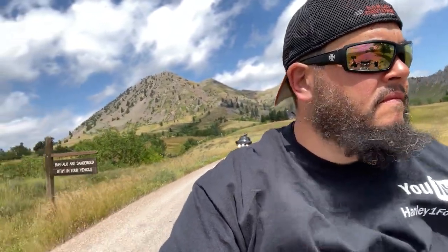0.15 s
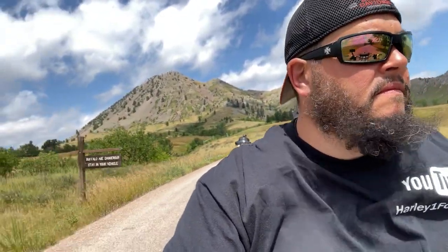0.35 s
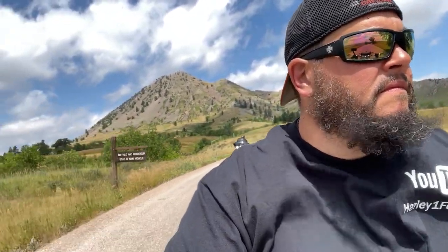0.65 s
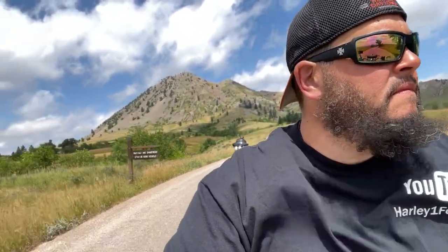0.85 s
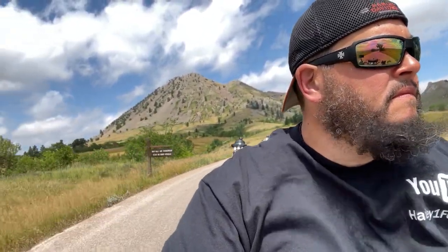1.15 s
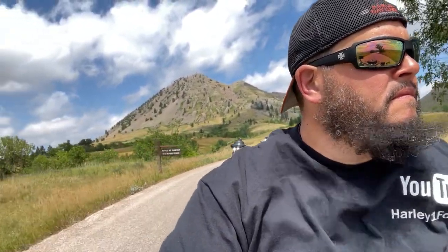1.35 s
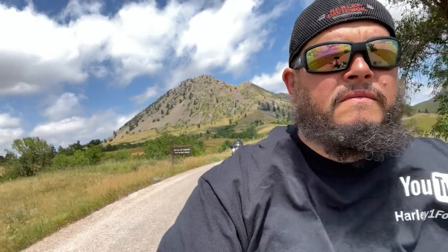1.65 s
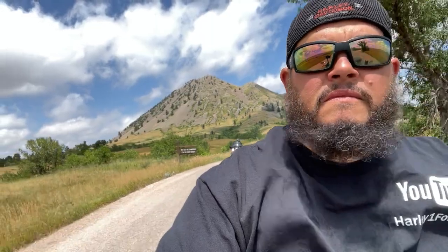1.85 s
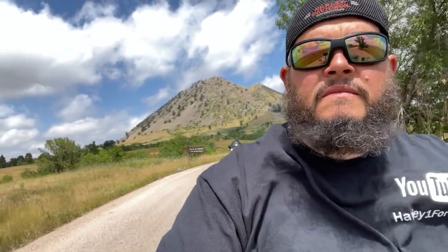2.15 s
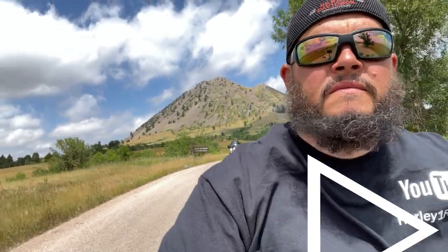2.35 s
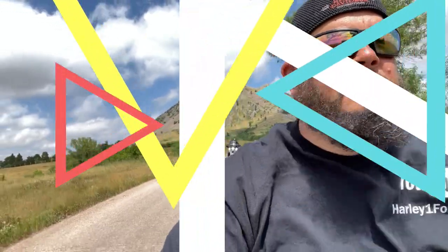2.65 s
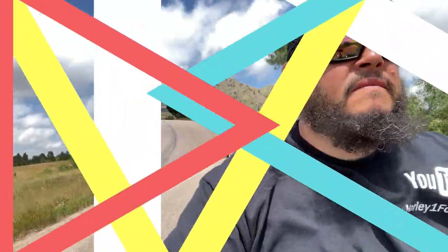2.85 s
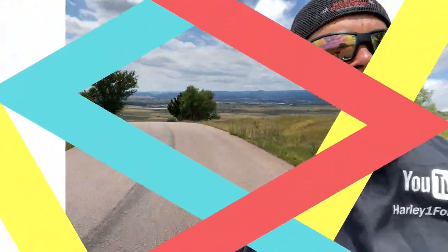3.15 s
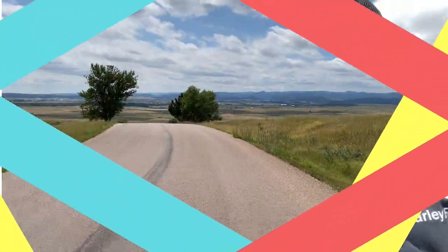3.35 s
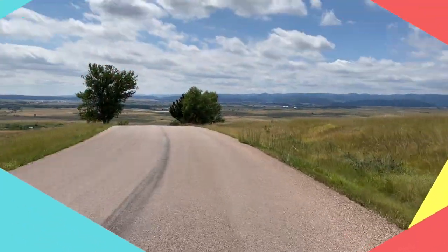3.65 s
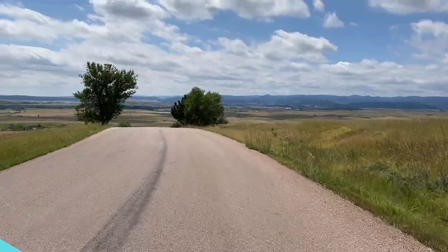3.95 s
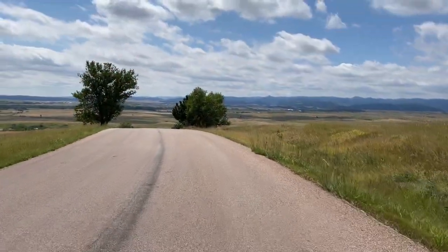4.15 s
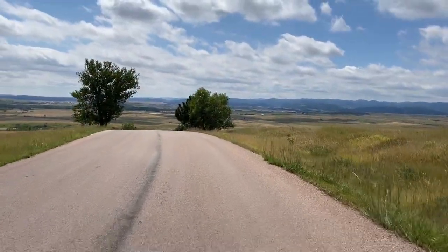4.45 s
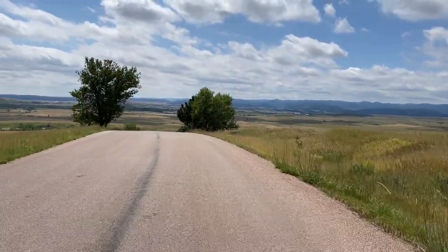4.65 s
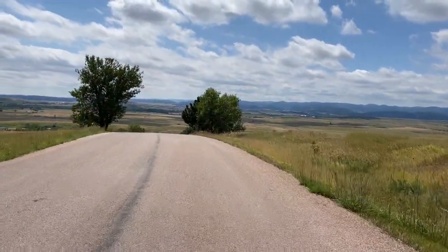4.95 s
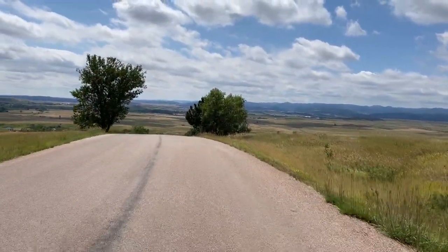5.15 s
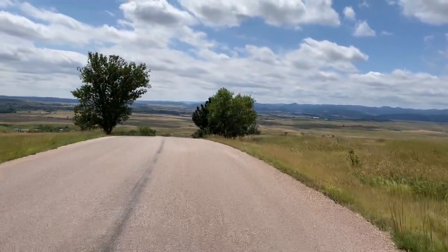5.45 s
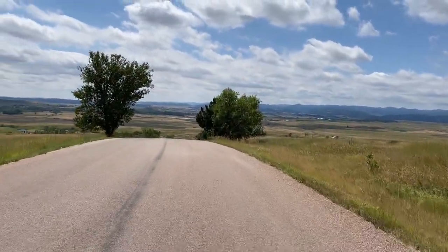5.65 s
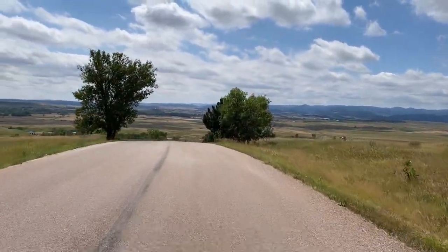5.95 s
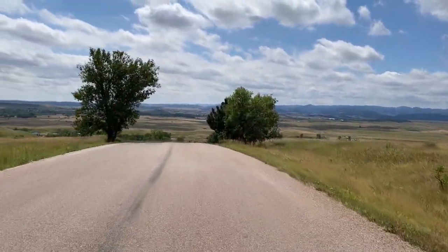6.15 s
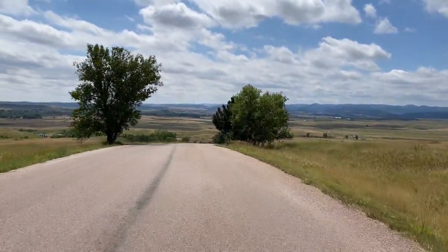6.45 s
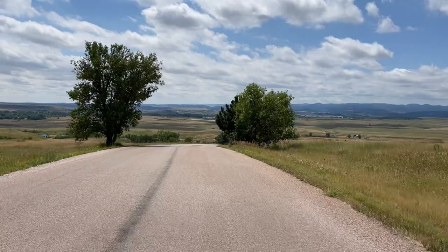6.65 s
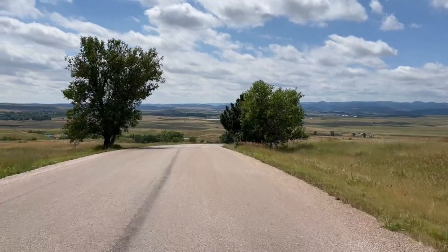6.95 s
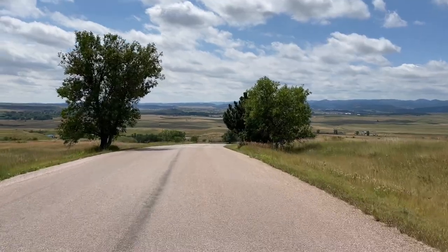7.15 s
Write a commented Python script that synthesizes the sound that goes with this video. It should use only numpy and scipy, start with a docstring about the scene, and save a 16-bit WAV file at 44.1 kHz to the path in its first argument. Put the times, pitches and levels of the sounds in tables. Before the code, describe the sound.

A big twin-cylinder motorcycle travels slowly on an open road. From 0 s a hand-held stereo microphone hears a subdued, uneven low chug at about nine engine cycles per second, with hollow frame drone, rattling loose parts, thin hiss and soft buffeting wind. A loud valve tick at 0.41 s leads into a sharp knock and low thud around 0.48 s; the sound drops suddenly and creeps back over a second or so, with metallic ticks standing out irregularly. Tiny bright clicks scatter from 2.1 to 2.45 s as hiss swells slightly. From 2.15 to 4 s it crossfades to a close engine position, crisper and bassier. At about 3.5 s the throttle blips: pitch nearly doubles, peaking in a strong roar near 4.2 s, then falls through 5.4 s, with a soft bump at 4.8 s. A loud, steady, lumpy throb with ticking continues until 7.3 s.

```python
"""A big twin-cylinder motorcycle rolls slowly along a country road, heard by a camera's two microphone ports.
Its exhaust is a sum of engine orders phased by two uneven firings; frame drone, air hiss and wind are
shaped noise; valve ticks and loose parts are struck resonances. A camera held out by hand gets knocked
and clicks; it cross-fades to one mounted near the engine, where the rider blips the throttle."""
import sys
import numpy as np
from scipy import signal
from scipy.fft import rfft, irfft, next_fast_len
from scipy.io import wavfile

SR = 44100
rng = np.random.default_rng(int(sys.argv[2]) if len(sys.argv) > 2 else 0)


def generate_wav(signal):
    """Clip the signal to [-1, 1] and save it as 16-bit WAV at the path in sys.argv[1]."""
    frames = np.transpose(np.atleast_2d(signal))
    scaled = np.clip(frames, -1, 1) * 32767
    pcm = np.round(scaled).astype(np.int16)
    wavfile.write(sys.argv[1], SR, pcm)


N = 322371
T = np.arange(N) / SR  # seconds
SIZE = next_fast_len(N + 8192)
HZ = np.fft.rfftfreq(SIZE, 1 / SR)

# Engine speed. Each row: time in seconds, four-stroke cycles per second.
HELD_SPEED = [(0.0, 9.194), (0.7, 9.399), (1.2, 9.133), (1.75, 9.249), (2.0, 8.391), (2.35, 9.565),
              (2.75, 8.609), (3.0, 9.096), (3.9, 9.324)]
MOUNT_SPEED = [(2.3, 9.669), (3.0, 9.137), (3.45, 9.321), (3.7, 11.374), (3.85, 14.207), (4.0, 16.556),
               (4.2, 17.342), (4.45, 17.048), (4.6, 16.261), (4.75, 15.051), (4.98, 13.616), (5.4, 11.716),
               (5.7, 11.588), (6.1, 11.855), (6.6, 11.731), (7.0, 11.915), (7.31, 11.785)]
HELD_TICK_S, MOUNT_TICK_S = 0.197, 2.586  # time of one valve tick, which sets the cycle phase
# Source levels against engine speed. Each row: cycles per second, exhaust in dB, drone in dB, hiss in dB,
# tick in dB over the hiss.
HELD_LEVELS = [(9.2, -36.5, -23, -40.5, 5.5)]
MOUNT_LEVELS = [(9.3, -26.5, -23, -41.5, 12.6), (11.8, -14, -23.5, -37, 4.5), (14, -13, -21.5, -36, 0.99),
                (17.3, -9, -22.5, -34.5, 0.27)]
# Road and load. Each row: time in seconds, exhaust and drone in dB over what the speed gives.
HELD_LOAD = [(0, -5, 1.5), (.2, -10, 0), (.28, -13, -1), (.48, -14, -1), (.6, 10.5, -0.5), (1.2, 12, 1),
             (2.3, -12, -1), (2.9, 4, -3), (2.99, 19, 1.5), (3.05, 0, -3), (3.6, 4, 0.5)]
MOUNT_LOAD = [(3.5, 8.5, -5), (3.97, 1, 1), (4.2, -1, 0), (4.35, -0.5, -1.5), (4.42, -3, 3.5),
              (4.6, -5.5, 0.5), (4.85, -0.5, 4), (5.0, 0.5, 0), (5.3, 2, -1), (5.9, 2.5, 0.5),
              (6.15, 2, -0.5), (6.5, 3.5, 0), (6.9, 4, 1.5), (7.0, 2, 1), (7.31, 1, -2)]

# Exhaust orders. Each row: multiple of the cycle rate, level in dB at each of the three ORDER_SPEEDS.
EXHAUST_ORDERS = [(3, -10, -26, -22), (4, -29, -10, -9), (5, -38, -15, 2), (6, -2.5, -4.5, -4),
                  (7, 0, -3, -37), (8, 0, -12, -21.5), (9, 1, -9, -29), (10, -2.5, -27, -23.5),
                  (11, -3, -10.5, -25), (13, -2, -21, -26.5), (21, -18, -18.5, -55)]
# Engine speeds of the order levels, in cycles per second.
ORDER_SPEEDS = [9.3, 11.8, 17.3]
# Firings of the two cylinders. Each row: share of the cycle after the tick, level in dB.
FIRINGS = [(.63, 0), (.03, -1.4)]
PIPE_DELAY_S = 0.01363  # a firing takes this long to leave the pipe

# Frame resonances. Each row: frequency in Hz, width in Hz, peak in dB.
FRAME_MODES = [(243.2, 45, 5), (296.7, 22.5, 7), (425.5, 98, 5.5), (515, 12.5, 7), (583.9, 30, 10.5),
               (632, 140, 3.5), (1281, 78, 4.5)]
# Engine case resonances heard only close by. Each row: frequency in Hz, width in Hz, peak in dB.
CASE_MODES = [(1577, 40, 4), (2201, 40, 3), (2871, 40, 3), (3285, 50, 4), (3822, 50, 5.5), (8705, 90, 4.5),
              (11519, 150, 3)]
# Drone parts, each lumpy on its own. Each row: from Hz, to Hz, level in dB, depth of the lumps in dB.
DRONE_BANDS = [(227, 359, -4.5, 1), (386, 550, -5.5, 2.5), (540, 690, -6.5, 2.5), (620, 1130, -8.5, 2.85)]
# Drone swells, twice a cycle. Each row: share of the cycle, level in dB.
SHUDDERS = [(0.39, -1), (0.12, -6.5)]

# Valve blows. Each row: share of the cycle, hiss burst in dB, cover ring in dB.
HELD_VALVES = [(0, 1, -3.5), (0.422, -8, -14), (0.698, -14, -20)]
MOUNT_VALVES = [(0, -0.5, -5), (0.229, -13, -6.5), (.42, -9, -23)]
# Valve cover modes, from the side and from above. Each row: frequency in Hz, width in Hz, level in dB.
HELD_COVER_MODES = [(1200, 80, 0), (1770, 70, 2), (2050, 80, 2), (2730, 90, -2), (3050, 90, -2),
                    (3470, 90, -1), (3800, 100, -4)]
MOUNT_COVER_MODES = [(1160, 100, -1), (1685, 90, -3), (1902, 70, 2), (2700, 100, -4), (3640, 100, -6)]
# Weakening of every second tick. Each row: time in seconds, level in dB.
HELD_WEAK_TICKS = [(0, -26), (1.8, -1), (2.1, 0.5)]
MOUNT_WEAK_TICKS = [(0, -0.41)]
# Ticks that stand out or fall back. Each row: time in seconds, level in dB over the usual tick.
HELD_ODD_TICKS = [(.628, -2), (.675, 5), (.733, 9), (.949, 8.5), (1.215, 13), (1.273, -2.5), (1.385, -5),
                  (1.434, 12), (1.493, 1), (1.65, 8), (2.162, 0), (2.483, -4), (2.596, 1), (2.707, -0.5),
                  (2.935, 2), (3.047, 0), (3.268, 3)]
MOUNT_ODD_TICKS = [(2.80, 3), (3.555, 2.8), (4.361, 2.3), (4.422, 5), (4.607, 1.9), (5.49, 4.8),
                   (6.172, 3.3), (6.256, 1.3), (6.427, 5), (6.682, 3.7), (7.188, 4.1), (7.27, 1)]
CLATTER_S, CLATTER_SHARE = 0.0017, 0.91  # a valve lands as a blow and a short rattle

# Loose parts. Each row: frequency in Hz, width in Hz, level in dB.
LOOSE_PART_MODES = [(1004, 27, -0.5), (1090, 60, -6), (1280, 37, -3), (1595, 70, 3), (2220, 84, -1.5)]
RATTLE_PER_S, RATTLE_SPREAD_DB = 40, 9  # mean shakes per second of each part, range of their strength

HISS_GUST_SHARE = 0.35  # of the drone's gusts in dB
SWELL_S, SWELL_WIDTH_S, SWELL_DB = 2.25, 0.1, 3  # the hiss swells while roadside trees go by

# Wind on the ports. Each row: time in seconds, level in dB.
HELD_WIND = [(0, -16.5), (.41, -16.5), (.5, -22), (.54, -20), (.62, -20), (.85, -15.5), (1.1, -20.5),
             (1.4, -15.5), (2.2, -19.5), (2.4, -12), (2.6, -19), (3.5, -17.5)]
MOUNT_WIND = [(3.4, -27), (3.85, -20), (4.049, -25), (4.5, -19), (4.7, -17), (4.9, -18.5), (5.15, -22),
              (5.8, -23), (7.31, -21)]
THROB_DB = 2.2  # exhaust puffs push the wind at the ports once a cycle

# Bumps on the camera, and one loud valve tick at 0.413 s. Each row: time in seconds, rattle drive in dB,
# decay in seconds, sharpness of the blow as a multiple of the drive, thud in dB.
IMPACTS = [(0.413, -25.5, 0.0038, .5, -28), (0.462, -33, 0.0091, 0.27, -30),
           (0.4784, -30.5, .002, 8.8, -12), (0.483, -42, 0.0018, 22, -35), (4.824, -30.5, 0.017, .3, -26)]
# Modes rung by the bumps and the loud tick. Each row: frequency in Hz, width in Hz, level in dB.
IMPACT_MODES = [(170, 60, 3), (330, 120, 8), (700, 300, 7), (1950, 600, -2), (3300, 1500, 0),
                (5500, 2500, -4)]
THUD_START_HZ, THUD_END_HZ, THUD_SAG_S, THUD_DECAY_S = 490, 59.7, 0.0068, 0.022
# Small bright clicks. Each row: time in seconds, level in dB, frequency in Hz.
GRIT = [(2.1066, -38, 5980), (2.1889, -36, 5850), (2.2777, -35, 5900), (2.3244, -32, 5820),
        (2.3411, -37, 5820), (2.3481, -34, 5900), (2.3481, -37, 3500), (2.378, -37, 6000),
        (2.4543, -32, 6160)]

# Microphone ports. Each row: frequency in Hz, relative left noise density in dB, right over left in dB,
# likeness of the two noises from 0 to 1, right phase in radians.
HELD_PORTS = [(19.8, -51, -7, 0.7, -20.5), (46, -42, 1.5, 1, 1.5), (77.5, -40.5, -3.5, 0.33, -0.16),
              (174, -54, 3.5, 0.68, -3), (278, -44.5, -1.5, 0.73, -3), (761, -51, 4.5, 0.99, -3),
              (768, -52, -1, 0.88, -3.5), (1325, -68.5, 1, 0.41, -3), (1770, -73, -5.5, 0.87, -2),
              (3320, -78.5, -1, 1, -2), (5100, -88, -2.5, 0.1, -2), (7840, -83, -3, 0, 7),
              (10200, -104, 2.5, 0.8, -4.5), (16200, -118, 4, .1, -7)]
MOUNT_PORTS = [(25, -46, -1, .85, .1), (75, -36, 0, .9, 0), (170, -48, -1, .7, -.1),
               (240, -48, 0, .8, 1.55), (700, -52, 1, .93, 2), (950, -60, 1, .65, 2.8),
               (1350, -67, -1, .3, 3.6), (1850, -76, 5, .3, 6.2), (2600, -75, -3, .55, 4.2),
               (3700, -75.5, -5.5, .5, 4.8), (5300, -79, -8, .45, 5.5), (7500, -76, -4, .7, 5.2),
               (8600, -73, 0, .9, 6.3), (10500, -71, -1, .92, 9.8), (11800, -75, -1, .8, 12),
               (12900, -89, 0, .4, 13.7), (14700, -87, -1, .55, 16.5), (16000, -94, 0, .55, 18.7)]
DIP_S, DIP_DB, DIP_ONSET_S, DIP_RECOVER_S = 0.496, -9, 0.0066, 0.9  # held sound drops and creeps back
FADE_START_S, FADE_END_S, FADE_IN_POWER, FADE_OUT_POWER = 2.15, 3.98, 1.54, 0.53
EDGE_HZ = 15850  # upper band limit


def gain_of(db):
    """Logarithmic level: decibels become an amplitude ratio."""
    return 10 ** (np.asarray(db) / 20)


def curve(table):
    """Linear interpolation: a table of times and values becomes a value at every sample."""
    return np.interp(T, *np.transpose(table))


def random_curve(points):
    """Slow random modulation: normal draws are joined by straight lines."""
    return np.interp(T, np.linspace(0, T[-1], num=points), rng.standard_normal(points))


def convolved(x, kernel):
    """Linear superposition: every impulse of x launches a copy of the kernel."""
    return signal.oaconvolve(x, kernel)[:N]


def exhaust_beats(cycles, rate, waver_db, lag_rad):
    """Fourier synthesis: two uneven firings a cycle set the phases of slowly wavering engine orders."""
    out = np.zeros(N)
    for order, *db in EXHAUST_ORDERS:
        pair = sum(gain_of(g) * np.exp(-2j * np.pi * order * share) for share, g in FIRINGS)
        waver = random_curve(40)
        level = gain_of(np.interp(rate, ORDER_SPEEDS, db) + waver_db * waver)
        pipe_lag = 2 * np.pi * order * rate * PIPE_DELAY_S
        phase_waver = 0.83 * waver[::-1]
        phase = 2 * np.pi * order * cycles + np.angle(pair) - pipe_lag + lag_rad + phase_waver
        out += level * np.cos(phase)
    burn = np.interp(cycles - cycles[0], np.arange(200), rng.standard_normal(200))
    return out * gain_of(1.46 * burn)  # some cycles fire harder


def train(cycles, pattern, spread_db):
    """Periodic impulsive excitation: one blow of uneven strength at each marked place of every cycle."""
    out = np.zeros(N)
    luck = rng.standard_normal((200, len(pattern)))
    burn_db = rng.standard_normal(200)  # no two cycles burn alike
    for k, (share, db) in enumerate(pattern):
        at = np.flatnonzero(np.diff(np.floor(cycles - share)))
        out[at] += gain_of(db + spread_db * luck[:len(at), k] + burn_db[:len(at)])
    return out


def band(lo_hz, hi_hz):
    """Band-pass filtering: smooth gains whose squares add up with their neighbours."""
    return np.sqrt(1 / (1 + (lo_hz / (HZ + 1)) ** 10) / (1 + (HZ / hi_hz) ** 10))


def resonance_gain(modes):
    """Resonance: each mode lifts the noise power around its frequency."""
    power = np.ones(len(HZ))
    for hz, width, db in modes:
        power += (gain_of(2 * db) - 1) / (1 + (2 * (HZ - hz) / width) ** 2) ** 2
    return np.sqrt(power)


def frame_drone(cycles, drone, gusts, peaks):
    """Forced vibration: noise bands coloured by resonances swell twice a cycle and lump separately."""
    swell = 1.9 + 1.2 * convolved(train(cycles, SHUDDERS, spread_db=2.5), np.hanning(900))
    swell /= np.sqrt(np.mean(swell ** 2))
    noises = []
    for lo_hz, hi_hz, db, lumps_db in DRONE_BANDS:
        lumps = gain_of(db + lumps_db * random_curve(110))
        noises.append((band(lo_hz, hi_hz) * peaks, drone * gusts * lumps * swell))
    return noises


def ring(x, modes):
    """Damped free vibration: blows excite two-pole modes that die away."""
    out = np.zeros(N)
    for hz, width, db in modes:
        r, turn = np.exp(-np.pi * width / SR), 2 * np.pi * hz / SR
        out += gain_of(db) * signal.lfilter([0, r * np.sin(turn)], [1, -2 * r * np.cos(turn), r * r], x)
    return out


def fading(x, decay_s):
    """Exponential decay: each blow leaves a tail that dies away."""
    return signal.lfilter([1], [1, -np.exp(-1 / (decay_s * SR))], x)


def tick_strength(cycles, tick, weak_ticks, odd_ticks):
    """Amplitude modulation: every second tick follows its own level and marked ticks differ."""
    odd = np.floor(cycles + 0.1) % 2
    marked_db = np.zeros(N)
    for s, db in odd_ticks:
        marked_db[round((s - 0.015) * SR):round((s + 0.035) * SR)] = db
    return tick * gain_of(odd * curve(weak_ticks) + marked_db)


def valve_ring(cycles, tick, valves, cover):
    """Impact excitation: each valve lands as a blow and a short rattle that ring the cover."""
    pattern = [(share, strike_db) for share, _, strike_db in valves]
    grain = rng.standard_normal(N) / np.sqrt(CLATTER_S * SR / 2)
    out = np.zeros(N)
    for mode in cover:
        signs = np.sign(rng.standard_normal(N))
        strikes = train(cycles, pattern, spread_db=1.8) * tick * signs
        clatter = CLATTER_SHARE * grain * fading(strikes, CLATTER_S)
        out += ring(strikes + clatter, [mode])
    return out


def loose_parts():
    """Random excitation: scattered soft blows ring each loose part."""
    out = np.zeros(N)
    for mode in LOOSE_PART_MODES:
        struck = rng.random(N) < RATTLE_PER_S / SR
        strength = gain_of(-RATTLE_SPREAD_DB * rng.random(N))
        shakes = struck * strength * np.sign(rng.standard_normal(N))
        out += ring(convolved(shakes, np.hanning(12) / 3), [mode])
    return out


def air_hiss(cycles, hiss, tick, valves, gusts, peaks, tick_decay_s):
    """Modulated broadband noise: the hiss follows part of the gusts and bursts at each valve tick."""
    pattern = [(share, burst_db) for share, burst_db, _ in valves]
    ticks = tick * train(cycles, pattern, spread_db=1.0)
    t = T[:2000]
    burst = convolved(ticks, np.exp(-t / tick_decay_s) * (1 - np.exp(-t / 0.0018)))
    return band(922, 20000) * peaks, gusts ** HISS_GUST_SHARE * hiss * np.sqrt(1 + (2 * burst) ** 2)


def port_wind(cycles, wind_curve, throb_share):
    """Low-frequency turbulence: wind noise at the ports throbs once a cycle."""
    throb_db = THROB_DB * np.cos(2 * np.pi * (cycles - throb_share))
    return band(35, 182.6), gain_of(curve(wind_curve) + throb_db)


def ports(table, sound, noises=()):
    """Partial coherence: port-coloured noises are partly alike; the direct sound differs in level and phase."""
    f, *columns = np.transpose(table)
    db, right_db, like, phase = (np.interp(np.log(HZ + 1), np.log(f), c) for c in columns)
    like = np.clip(like, 0, 1)
    turn = gain_of(right_db) * np.exp(1j * phase)
    colour = gain_of(db)
    mid_power = colour ** 2 * (1 + abs(turn) ** 2 + 2 * like * turn.real) / 4
    shared, apart = np.zeros((2, len(HZ)), complex)
    for gain, envelope in noises:
        filtered = colour * gain / np.sqrt(np.mean(mid_power * gain ** 2))  # unit power in the channel mean
        a, b = rfft(rng.standard_normal((2, N)) * envelope, SIZE) * filtered
        shared, apart = shared + a, apart + b
    direct = rfft(sound, SIZE)
    right = turn * (direct + like * shared + np.sqrt(1 - like ** 2) * apart)
    return irfft(np.array([direct + shared, right]), SIZE)[:, :N]


def camera(speed, tick_s, levels, load, valves, cover, weak_ticks, odd_ticks, resonances, wind, table,
           tick_decay_s, ring_db, rattle_db, waver_db, throb_share):
    """Superposition: all sources share one engine phase and add up at one camera position."""
    rate = curve(speed)
    cycles = np.cumsum(rate) / SR
    cycles -= np.interp(tick_s, T, cycles)
    at_rate, *columns = np.transpose(levels)
    exhaust, drone, hiss, tick = (gain_of(np.interp(rate, at_rate, c)) for c in columns)
    at_s, exhaust_db, drone_db = np.transpose(load)
    exhaust = exhaust * gain_of(np.interp(T, at_s, exhaust_db))
    drone = drone * gain_of(np.interp(T, at_s, drone_db))
    hiss = hiss * gain_of(SWELL_DB * np.exp(-((T - SWELL_S) / SWELL_WIDTH_S) ** 2))
    tick = tick_strength(cycles, tick, weak_ticks, odd_ticks)
    gusts = gain_of(0.52 * random_curve(90))
    peaks = resonance_gain(resonances)

    engine = exhaust * exhaust_beats(cycles, rate, waver_db, lag_rad=0.36)
    engine += gain_of(ring_db) * hiss * valve_ring(cycles, tick, valves, cover)
    engine += gain_of(rattle_db) * hiss * loose_parts()
    noises = frame_drone(cycles, drone, gusts, peaks)
    noises.append(air_hiss(cycles, hiss, tick, valves, gusts, peaks, tick_decay_s))
    noises.append(port_wind(cycles, wind, throb_share))
    return ports(table, engine, noises)


def impacts():
    """Impact response: bumps and one loud valve tick ring modes by a blow and a rattle, over a sagging thud."""
    drive, thuds, t = np.zeros(N), np.zeros(N), T[:4096]
    sag_turns = (THUD_START_HZ - THUD_END_HZ) * THUD_SAG_S * (1 - np.exp(-t / THUD_SAG_S))
    thud = np.exp(-t / THUD_DECAY_S) * np.sin(2 * np.pi * (THUD_END_HZ * t + sag_turns))
    for s, db, decay_s, sharpness, thud_db in IMPACTS:
        at = round(s * SR)
        drive[at:at + len(t)] += gain_of(db) * rng.standard_normal(len(t)) * np.exp(-t / decay_s)
        drive[at] += sharpness * gain_of(db)
        thuds[at:at + len(t)] += gain_of(thud_db) * thud
    soft = convolved(drive, np.hanning(7) / 3)
    return ports(HELD_PORTS, gain_of(-2.5) * ring(soft, IMPACT_MODES)) + thuds


def grit():
    """Short wave packets: a Gaussian envelope leaves a few cycles of each bright click."""
    out, t = np.zeros(N), T[:128]
    envelope = np.exp(-((t - 0.001) / 0.00042) ** 2)
    for s, db, hz in GRIT:
        at = round(s * SR)
        out[at:at + len(t)] += gain_of(db) * envelope * np.sin(2 * np.pi * hz * t)
    return out * gain_of([[1.5], [-1.5]])  # left, right


def scene():
    """Cross-fading: the hand-held sound dips briefly, then yields to the mounted camera."""
    held = camera(HELD_SPEED, HELD_TICK_S, HELD_LEVELS, HELD_LOAD, HELD_VALVES, HELD_COVER_MODES,
                  HELD_WEAK_TICKS, HELD_ODD_TICKS, FRAME_MODES, HELD_WIND, HELD_PORTS,
                  tick_decay_s=0.0097, ring_db=5.0, rattle_db=6.0, waver_db=-3.5, throb_share=0.082)
    mount = camera(MOUNT_SPEED, MOUNT_TICK_S, MOUNT_LEVELS, MOUNT_LOAD, MOUNT_VALVES, MOUNT_COVER_MODES,
                   MOUNT_WEAK_TICKS, MOUNT_ODD_TICKS, FRAME_MODES + CASE_MODES, MOUNT_WIND, MOUNT_PORTS,
                   tick_decay_s=0.0062, ring_db=-4.5, rattle_db=-19, waver_db=1.0, throb_share=0.69)
    since = np.maximum(T - DIP_S, 0)
    dip = gain_of(DIP_DB * np.minimum(since / DIP_ONSET_S, 1) * np.exp(-since / DIP_RECOVER_S))
    fade = np.clip((T - FADE_START_S) / (FADE_END_S - FADE_START_S), 0, 1)
    held_part = held * dip * (1 - fade) ** FADE_OUT_POWER
    return held_part + mount * fade ** FADE_IN_POWER + impacts() + grit()


def record(dry):
    """Band limiting and soft saturation: the camera cuts deep bass, rounds high peaks, then cuts the top."""
    cut = signal.sosfilt(signal.butter(3, 30, "high", fs=SR, output="sos"), dry)
    over = np.maximum(abs(cut) - 0.7, 0)
    rounded = cut - np.sign(cut) * (over - 0.3 * np.tanh(over / 0.3))
    edge = signal.firwin(511, EDGE_HZ, window=("kaiser", 9), fs=SR)
    return np.clip(signal.oaconvolve(rounded, edge[None], "same"), -1, 1)


dry = scene()
out = record(dry)
generate_wav(out)
```